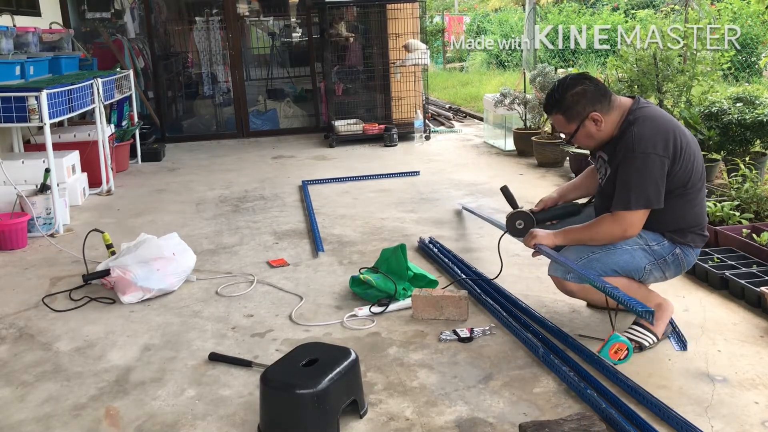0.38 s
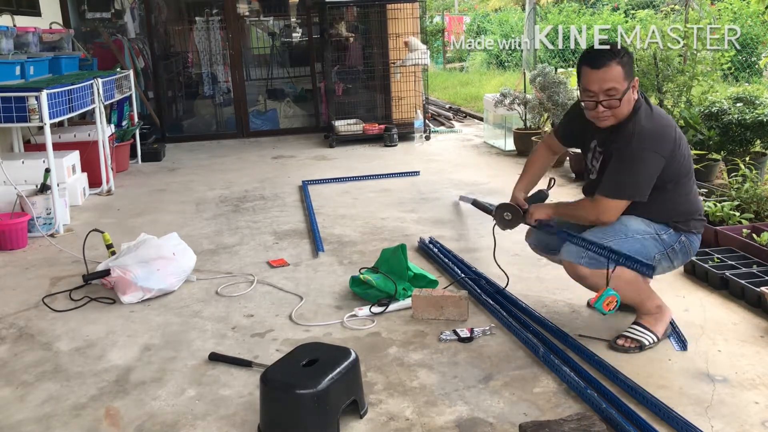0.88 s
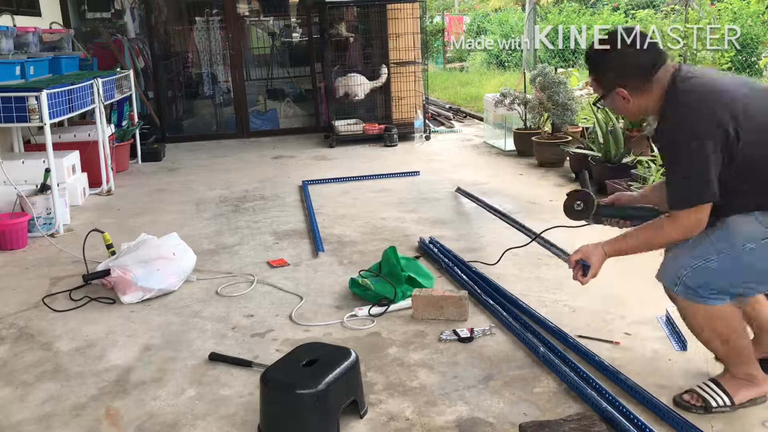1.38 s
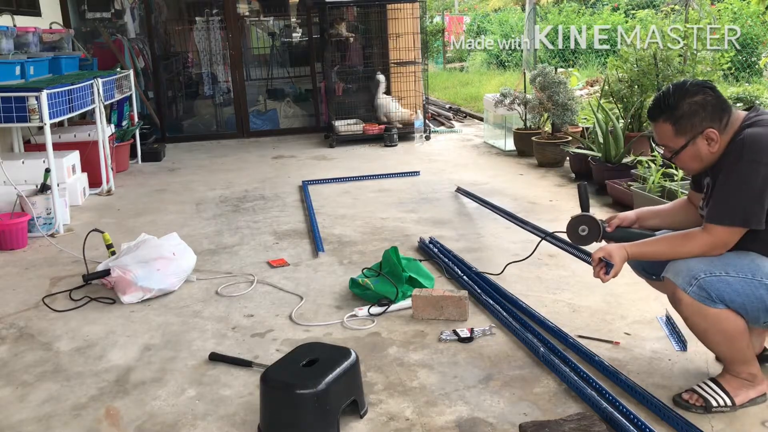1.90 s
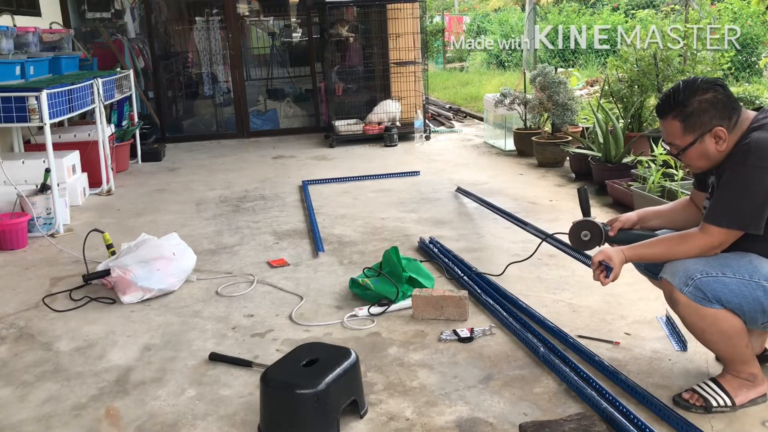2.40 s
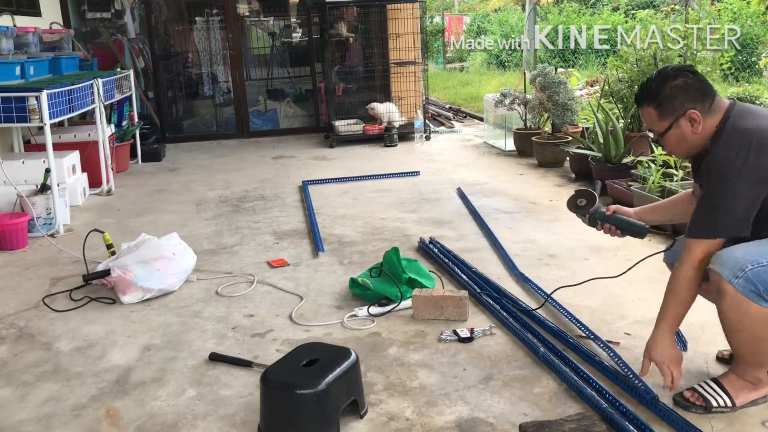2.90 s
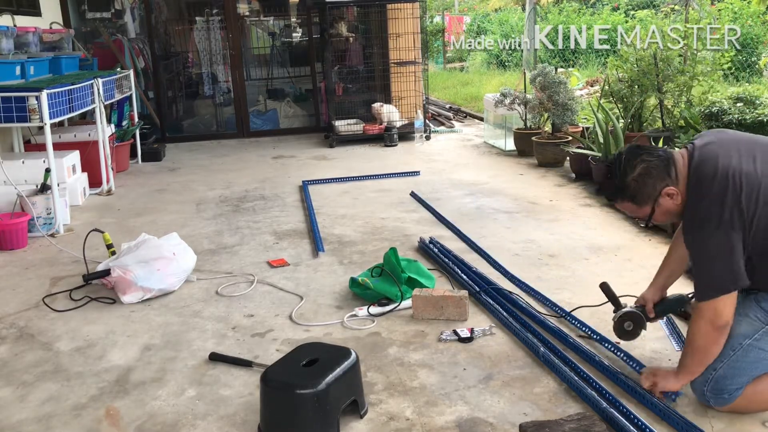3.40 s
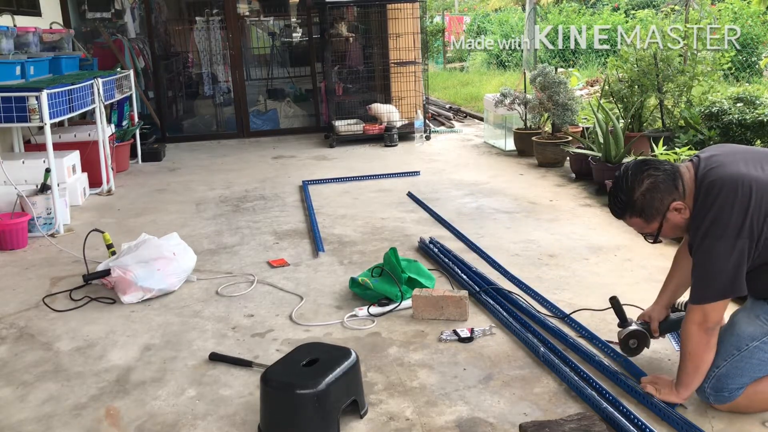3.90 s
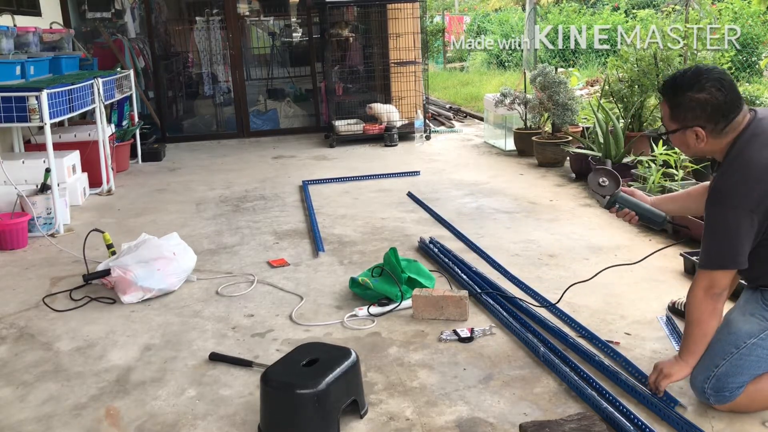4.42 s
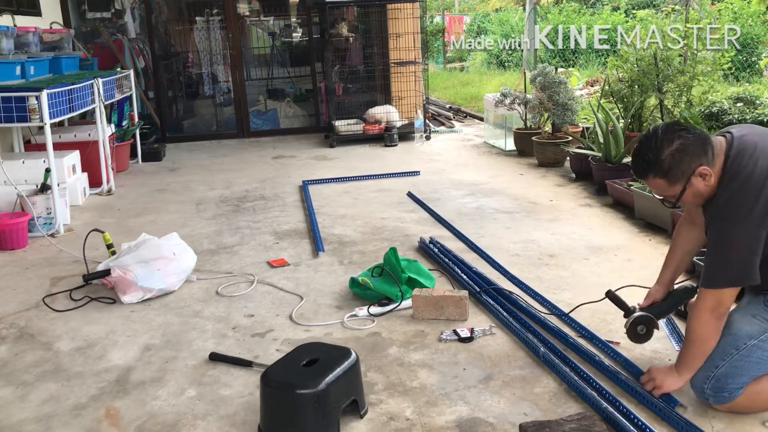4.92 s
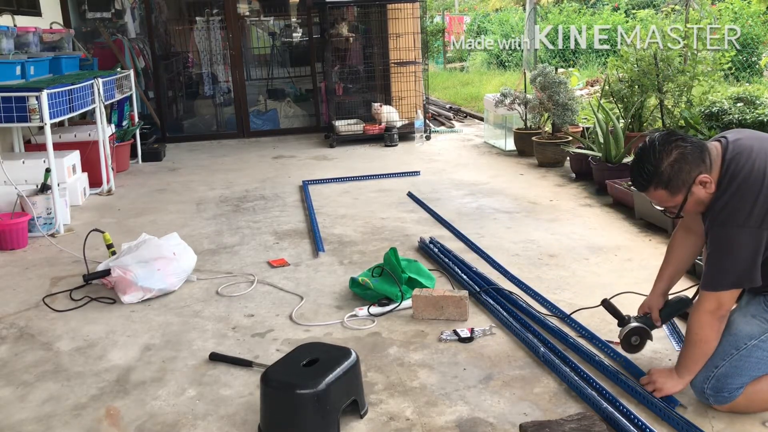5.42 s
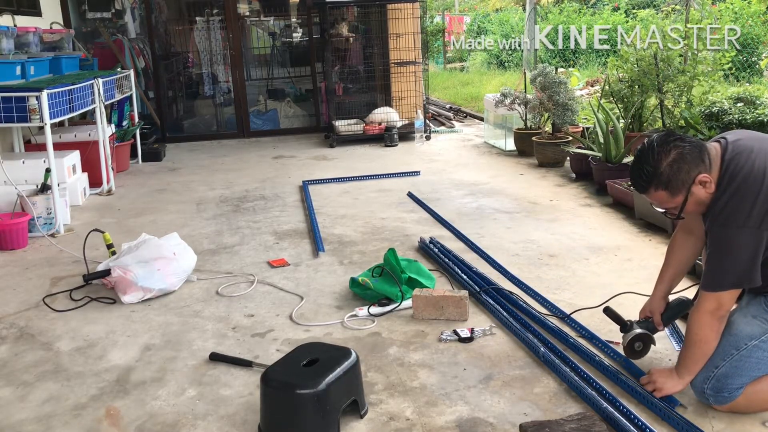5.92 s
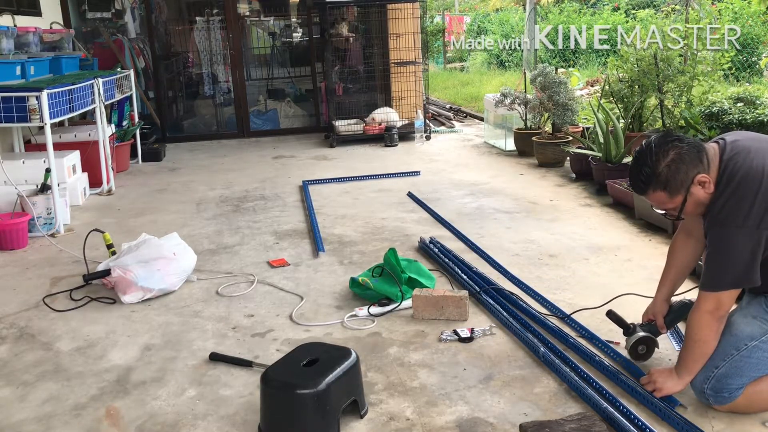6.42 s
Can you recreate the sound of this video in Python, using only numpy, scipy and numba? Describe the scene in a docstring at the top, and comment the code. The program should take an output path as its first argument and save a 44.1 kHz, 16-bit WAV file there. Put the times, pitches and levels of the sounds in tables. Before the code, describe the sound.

On a concrete porch, a hand-held grinder whirs thinly and bites steel briefly, then stops amid sharp clicks. It restarts into a longer, piercing, ringing screech that sags under load. Clacks and a squeak follow, then a duller cut, a quiet pause, and a restart with softer, interrupted cuts. Faint hum and outdoor wash lie beneath. One fairly distant microphone, almost no bass, everything unnaturally quick.

```python
"""On a concrete porch a hand-held angle grinder cuts thin steel angle, heard at several times its natural speed.
The motor fan is shaped noise with gear tones; load slows the wheel, whose strikes once a turn excite the
steel at multiples of the turn rate. Offcuts click as decaying noise bursts, short bursts rasp and small
things squeak as harmonic series, over mains hum, far traffic and an outdoor wash; one microphone, no bass."""
import sys
import numpy as np
from scipy import signal
from scipy.fft import rfft, irfft
from scipy.io import wavfile
from scipy.ndimage import uniform_filter1d
from numba import njit

SR = 44100
rng = np.random.default_rng(int(sys.argv[2]) if len(sys.argv) > 2 else 0)


def level_to_linear(level):
    """Convert decibel levels to linear amplitude factors, elementwise."""
    exponent = np.asarray(level, float) / 20
    return 10 ** exponent


def store_wav(level_fs):
    """Save 16-bit WAV to argv[1]."""
    pcm = np.round(np.clip(np.atleast_2d(level_fs), -1, 1) * 32767)
    wavfile.write(sys.argv[1], SR, pcm.T.astype(np.int16))


N = 288855
T = np.arange(N) / SR
TOP_HZ = 15700  # upper edge of the sound
RECOVERY_HZ, IDLE_HZ = 699.5, 686  # rate the recovery heads for; unloaded turn rate, at which it is capped


def level(x, db):
    """Normalization: scale a signal to an rms level in dB."""
    return x * level_to_linear(db) / np.sqrt(np.mean(x ** 2) + 1e-18)


def colour(x, gain):
    """Minimum-phase filtering: folding the cepstrum of gain(Hz) gives a causal impulse response."""
    cepstrum = irfft(np.log(gain(np.linspace(1, SR / 2, 2049)) + 1e-5))
    cepstrum[1:2048] *= 2
    cepstrum[2049:] = 0
    response = irfft(np.exp(rfft(cepstrum)))[:2048]
    return signal.fftconvolve(x, response)[:len(x)]


def shape(points):
    """Spectral envelope: gain interpolated in dB over log frequency from (f/Hz, level/dB) points."""
    hz, db = np.transpose(points)
    return lambda f: level_to_linear(np.interp(np.log(f), np.log(hz), db))


def hump(hz, octaves):
    """Broad resonance: Gaussian gain on a log-frequency axis, its standard deviation in octaves."""
    return lambda f: np.exp(-.5 * (np.log2(f / hz) / octaves) ** 2)


def split_at(x, hz, order):
    """Crossover: Butterworth low and high bands of a signal."""
    return [signal.sosfilt(signal.butter(order, hz, kind, fs=SR, output="sos"), x) for kind in ("low", "high")]


def walk(n, rate):
    """Slow random modulation: levels held 1 / rate s and slewed twice, spread near 1."""
    held = max(int(SR / rate), 1)
    steps = np.repeat(rng.standard_normal(n // held + 1), held)
    return 1.204 * uniform_filter1d(uniform_filter1d(steps, held), held)[:n]


def between(start, end):
    """Time sampling: the span of samples between two times in s."""
    return slice(int(start * SR), min(int(end * SR), N))


def play(rows):
    """Linear interpolation: the span of a table that begins with t/s, and its other columns by sample."""
    times, *columns = np.transpose(rows)
    span = between(times[0], times[-1])
    return span, [np.interp(T[span], times, column) for column in columns]


def fade(n, s):
    """Amplitude envelope: linear ramps of s seconds at both ends."""
    i = np.arange(n)
    return np.clip(np.minimum(i, n - i) / (s * SR), 0, 1)


@njit
def lag(x, rise, fall):
    """First-order relaxation: follow x at one rate per sample upward and another downward."""
    y, z = np.empty(len(x)), 0.
    for i in range(len(x)):
        z += (x[i] - z) * (rise if x[i] > z else fall)
        y[i] = z
    return y


def patchy(x, db, rate):
    """Band modulation: each of seven treble regions swells and thins on its own."""
    changes = 0
    for hz in np.geomspace(2700, 14000, num=7):
        changes = changes + colour(x, hump(hz, 0.12)) * (level_to_linear(db * walk(N, rate)) - 1)
    return x + changes


def chirps():
    """Gaussian tone bursts with a slight glide: faint thin chirps flicker in the treble."""
    count, low_hz, loudest_db, unit_s = 90, 3400, -59, .014
    out, t = np.zeros(N), T[:3000]
    for when, pitch, softness, length, glide in rng.random((count, 5)):
        hz = low_hz * 2 ** (2 * pitch) * (1 + (glide - .5) * t)
        envelope = np.exp(-((t / unit_s - 2) / (.5 + length)) ** 2)
        tone = np.sin(2 * np.pi * np.cumsum(hz) / SR + walk(len(t), 200))
        i = int(when * (N - len(t)))
        out[i:i + len(t)] += level_to_linear(loudest_db - 10 * softness) * envelope * tone
    return out


def mains_hum():
    """Harmonic radiation of a mains-driven machine nearby: multiples of one rate, each wavering slightly."""
    # hum lines: multiple of the base rate, rms level/dB
    lines = [(2, -68), (3, -80), (4, -68.5), (5, -77), (6, -69), (7, -73), (9, -74), (10, -72)]
    base_hz = 400.1
    out = np.zeros(N)
    for k, db in lines:
        tone = np.sin(2 * np.pi * k * base_hz * T + 0.21 * walk(N, 3.07))
        out += np.sqrt(2) * level_to_linear(db + 1.0 * walk(N, 6.2)) * tone
    return out


def far_engines():
    """Frequency glides: distant engine notes are unsteady sines moving from one pitch to another."""
    # far engine notes: start t/s, end t/s, first f/Hz, last f/Hz, peak level/dB
    drones = [(0, 0.805, 371.5, 387, -70), (0.793, 1.688, 390.5, 353.5, -69),
              (1.706, 1.804, 353, 250, -69.5), (2.586, 2.718, 237, 340, -72),
              (2.689, 4.767, 400.6, 386.8, -72.5), (4.755, 5.286, 380, 343.6, -65),
              (5.298, 6.516, 365, 417.5, -71.5), (0, 0.294, 730, 740, -62), (0.269, 0.952, 730, 788, -65.5),
              (3.334, 3.502, 395, 455, -69), (3.932, 4.396, 661, 740, -72),
              (4.41, 5.16, 251.7, 259.6, -73.5), (5.141, 5.34, 264.4, 224, -80),
              (5.807, 6.49, 256.8, 285.5, -79.5)]
    out = np.zeros(N)
    for start, end, first_hz, last_hz, db in drones:
        span, (hz,) = play([(start, first_hz), (end, last_hz)])
        n = len(hz)
        phase = 2 * np.pi * np.cumsum(hz + 1.8 * walk(n, 12)) / SR
        out[span] += level_to_linear(db + 1.9 * walk(n, 9.1)) * np.sin(phase) * fade(n, 0.027)
    return out


def yard():
    """Superposition of incoherent sources: a wash with patchy treble, chirps, hum and far engines."""
    # relative spectrum of the outdoor wash: f/Hz, level/dB per Hz
    spectrum = [(150, -26), (250, -20), (361, -8), (520, -10), (700, -14), (1500, -15), (2800, -14),
                (4700, -18.5), (6000, -18.5), (10000, -13), (16000, -19.5)]
    wash = level(colour(rng.standard_normal(N), shape(spectrum)), -59)
    wash = wash * level_to_linear(.9 * walk(N, 2.8))
    return patchy(wash, 3.5, 14) + chirps() + mains_hum() + far_engines()


def hits():
    """Impact excitation: a sharp tick and exponentially dying noise ring in one broad region."""
    # things striking concrete, and the switch click at 1.581 s: t/s, peak level/dB, centre f/Hz, width/octaves,
    # decay time by 60 dB/s
    strikes = [(1.164, -14.5, 8040, 1.23, 0.048), (1.19, -31.5, 10000, 1.3, 0.092),
               (1.222, -38, 7000, 0.83, 0.025), (1.358, -24, 7000, 1.9, 0.028),
               (1.581, -28.5, 9100, 1.43, 0.047), (2.659, -23.5, 11000, 0.47, 0.086),
               (2.66, -33.5, 1150, 1.17, 0.02), (2.679, -8.5, 2780, 1.7, 0.0037),
               (2.687, -12.5, 4500, 3.8, 0.0029), (2.83, -29, 7600, 0.38, 0.04),
               (2.948, -27.5, 1560, 0.79, 0.021), (2.956, -28, 1820, 0.39, 0.034),
               (2.956, -24.5, 6240, 0.46, 0.058), (4.43, -42, 6000, 0.77, 0.17),
               (5.151, -26.5, 11000, 1.8, 0.024)]
    out, t = np.zeros(N), T[:6000]
    for s, db, hz, octaves, t60 in strikes:
        push = .5 * rng.standard_normal(len(t)) * level_to_linear(-60 * t / max(t60, .001))
        push[0] = 2.95  # the tick
        sound = colour(push, hump(hz, octaves))
        i = int(s * SR)
        out[i:i + len(t)] += level_to_linear(db) * sound / np.max(np.abs(sound))
    return out


def rasps():
    """Band-limited noise: short rough bursts, from dragged steel or from the motor starting."""
    # rasping bursts: t/s, length/s, rms level before the envelope/dB, centre f/Hz, width/octaves
    bursts = [(4.895, 0.053, -58, 2830, 0.22), (0.916, 0.055, -56, 10500, 0.17),
              (.972, 0.072, -54, 10900, 0.79), (.768, .04, -59, 13200, .08),
              (1.364, 0.041, -47.5, 7000, 3.2), (1.612, 0.036, -39.5, 14500, 0.27),
              (4.262, 0.034, -54, 6000, 2.6), (4.905, 0.055, -42, 14500, 0.26),
              (5.161, 0.013, -42, 12000, 0.69), (5.175, 0.023, -45.5, 10300, 1.4),
              (5.343, .045, -44, 14100, 0.14)]
    out = np.zeros(N)
    for s, length, db, hz, octaves in bursts:
        n, i = int(length * SR), int(s * SR)
        rough = rng.standard_normal(n) * level_to_linear(3 * walk(n, 400))
        envelope = fade(n, 0.0029) * np.linspace(1.5, .4, n)
        out[i:i + n] += level(colour(rough, hump(hz, octaves)), db) * envelope
    return out


def squeaks():
    """Stick-slip oscillation: a harmonic series sounds where the rubbed thing resonates."""
    # steady squeaks: start t/s, length/s, pitch f/Hz, highest level/dB, strongest region f/Hz
    steady = [(0.63, 0.065, 1990, -61, 2010), (0.732, 0.031, 2660, -48.5, 6430),
              (3.311, 0.019, 1740, -30, 14300), (4.14, 0.061, 3830, -58.5, 3700),
              (4.656, 0.018, 2776, -43, 8250), (4.9, 0.036, 8140, -43.5, 8000)]
    # swooping squeaks: strongest region f/Hz, width/octaves, then rows of t/s, pitch f/Hz, level/dB
    swoops = [(2900, .4, [(.09, 2540, -82), (.13, 2900, -61), (.175, 3250, -68)]),
              (3300, .46, [(2.75, 1500, -45), (2.76, 2650, -38), (2.77, 3000, -37), (2.785, 2650, -37),
              (2.801, 1750, -46)]), (895, 0.56, [(4.422, 1140, -79), (4.432, 1016, -49.5), (4.46, 794, -56),
              (4.503, 690, -82)])]
    rise, edge_db, steady_octaves = 0.37, -10, 0.35  # share of the length; level at both ends; region width
    notes = []
    for s, length, hz, db, peak_hz in steady:
        rows = [(s, hz, db + edge_db), (s + rise * length, hz, db), (s + length, hz, db + edge_db)]
        notes.append((peak_hz, steady_octaves, rows))
    out = np.zeros(N)
    for peak_hz, octaves, rows in notes + swoops:
        span, (hz, db) = play(rows)
        n = len(hz)
        phase = 2 * np.pi * np.cumsum(hz * (1 + 0.022 * walk(n, 350))) / SR
        resonance = hump(peak_hz, octaves)
        note = np.zeros(n)
        for k in range(1, 11):
            partial = np.sin(k * phase + .45 * walk(n, 700))
            note += resonance(k * hz) * partial * (k * hz < TOP_HZ)
        out[span] += level(note, 0) * level_to_linear(db + 1.0 * walk(n, 143))
    return out


def wheel_phase():
    """Rotational dynamics under load: turn rate in Hz and angle; it sags in each press and recovers after."""
    # the hand leans on the tool: start t/s, end t/s, then the slowing below the recovery rate
    # at which it would settle, first f/Hz and last f/Hz
    presses = [(.24, .428, 27, 53), (1.815, 2.075, 46, 99), (2.075, 2.14, 89, 89), (2.253, 2.665, 74, 139),
               (3.61, 3.775, 49, 94), (3.801, 3.907, 49, 95), (5.518, 5.703, 22, 42), (5.76, 5.8, 40, 77),
               (5.85, 5.88, 31, 60), (5.963, 6.083, 35, 68), (6.121, 6.245, 40, 76), (6.413, 6.55, 38, 70)]
    sag_s, recover_s = .038, .13  # time constants
    judder = .03  # share of the slowing that wavers
    load = sum(np.interp(T, [start, end], [first, last], 0, 0) for start, end, first, last in presses)
    slowing = lag(load, 1 / (sag_s * SR), 1 / (recover_s * SR))
    hz = np.minimum(RECOVERY_HZ - slowing, IDLE_HZ)
    hz += judder * (IDLE_HZ - hz) * walk(N, 30)  # the hand trembles
    return hz, 2 * np.pi * np.cumsum(hz) / SR


def motor(turns, phase):
    """Turbulent fan noise and gear-mesh tones: both weaken as the wheel slows, and die away in coasting."""
    # motor runs: switch-on t/s, switch-off t/s, whir level below 10 kHz/dB, boost above 10 kHz/dB,
    # coasting loss/(dB/s)
    runs = [(-.1, 0.52, -50.5, 5, 49.5), (1.596, 2.673, -51, 6.5, 69), (2.716, 3.928, -50.5, 3, 132),
            (3.946, 4.078, -53.5, 8, 66), (4.877, 4.953, -52, 4.5, 64), (5.316, 6.55, -49.5, 1, 50)]
    # relative spectrum of the fan: f/Hz, level/dB per Hz
    whir = [(590, -49.5), (1000, -42.5), (1610, -16.5), (2150, -16), (2360, -8.5), (2560, -11.5),
            (4480, -13), (4800, -7.5), (5700, -5.5), (10200, -7.5), (12700, -1.5), (16000, -2)]
    # gearbox notes: multiple of the wheel turn rate (armature 3.55), peak level re whir below 10 kHz/dB
    gear_notes = [(1, -23), (2, -27), (3, -25), (3.55, -12.5), (4.55, -25)]
    dulled, top_dulled = 0.045, 0.035  # dB lost per Hz of slowing, below and above 10 kHz
    spin_up_s = 0.0057
    coast_dulling = 0.26  # the band above 10 kHz dies this share faster
    slowing = IDLE_HZ - turns
    rush = patchy(colour(rng.standard_normal(N), shape(whir)), 2.5, 22)
    low, top = split_at(rush, 10000, 4)
    scale = np.std(low)
    notes = np.zeros(N)
    for k, db in gear_notes:
        notes += level_to_linear(db + 2.2 * walk(N, 14)) * np.sin(k * phase + 0.26 * walk(N, 12))
    notes *= level_to_linear(-2 * dulled * slowing)  # the notes fade twice as fast in dB
    low *= level_to_linear(.8 * walk(N, 24) - dulled * slowing) / scale
    top *= level_to_linear(1.0 * walk(N, 25) - top_dulled * slowing) / scale
    out = np.zeros(N)
    for on, off, db, top_db, coast_db in runs:
        lost = coast_db * np.maximum(T - off, 0)
        spin_up = np.clip((T - on) / spin_up_s, 0, 1)
        out += (low + notes + top * level_to_linear(top_db - coast_dulling * lost)) * level_to_linear(db - lost) * spin_up
    return out


def whistles(angle):
    """Mode locking: one multiple of the turn rate locks on to the bar and stands out, wavering."""
    # whistling multiples: start t/s, end t/s, multiple of the turn rate, rms level before wavering/dB
    locked = [(0.324, 0.425, 6, -57.5), (.33, .43, 12, -58), (1.883, 1.956, 9, -51.5),
              (1.877, 1.95, 15, -49.5), (1.925, 2.004, 10, -47), (1.978, 2.14, 11, -48.5),
              (1.979, 2.1, 17, -46.5), (1.98, 2.14, 6, -61.5), (2.287, 2.395, 11, -49.5),
              (2.36, 2.467, 18, -35.5), (2.495, 2.63, 13, -42.5), (2.506, 2.593, 21, -31.5),
              (2.597, 2.663, 22, -30), (3.657, 3.724, 5, -50), (5.66, 5.71, 10, -55),
              (5.983, 6.2, 5, -63.5), (6.0, 6.216, 11, -61), (6.467, 6.554, 4, -60),
              (6.442, 6.553, 10, -58)]
    out = np.zeros(N)
    for start, end, multiple, db in locked:
        span = between(start, end)
        n = span.stop - span.start
        tone = np.sqrt(2) * np.sin(round(multiple) * angle[span] + 0.6 * walk(n, 90))
        out[span] += level_to_linear(db + 5.5 * walk(n, 32)) * tone * fade(n, 0.025)
    return out


def steel(f):
    """Modal resonance: bar and wheel modes over a rising skirt; the thin bar radiates little below its knee."""
    # narrow and broad resonances of bar and wheel: f/Hz, half-power width/Hz, level/dB
    modes = [(3700, 120, -16), (6300, 70, -19), (6800, 110, -11), (7600, 110, -10), (9000, 2000, -17),
             (11700, 2600, -11), (10900, 100, -8), (12300, 110, -6), (12600, 80, -10), (14800, 200, -3),
             (15300, 150, 0), (15600, 150, -3)]
    knee_hz = 6000
    skirt = level_to_linear(-18) * (f / 15000) ** 1.8
    power = sum(level_to_linear(db) ** 2 / (1 + (2 * (f - hz) / width) ** 2) for hz, width, db in modes)
    return np.sqrt(power + skirt ** 2) / np.sqrt(1 + (knee_hz / f) ** 8)


def flares():
    """Exponential growth and decay: the screech flares when the wheel catches; powers add."""
    # catches of the wheel: t/s, level/dB, held time/s
    catches = [(.262, -21, .005), (.378, -27, .01), (1.86, -27, 0.067), (2.01, -25.5, 0.0074),
               (2.085, -21, 0.018), (2.15, -23, 0.0054), (2.26, -22.5, 0.044), (2.475, -21.5, 0.0061),
               (2.58, -22, .03), (2.654, -22, .004), (5.6, -43.5, 0.0046), (5.68, -38, 0.0038),
               (5.789, -38.5, 0.0031), (5.88, -41.5, 0.0045), (6.14, -42.5, 0.087), (6.49, -39, 0.06)]
    rise, fall = 414, 255  # dB/s
    power = np.zeros(N)
    for s, db, held in catches:
        lost = rise * np.maximum(s - T, 0) + fall * np.maximum(T - s - held, 0)
        power += level_to_linear(db - lost) ** 2
    return power


def cutting(turns, angle):
    """Periodic forcing: the wheel's high spots strike the steel once a turn; grit rasps along with them."""
    # cuts in which the bar's narrow resonances sound, and cuts in which they are damped:
    # contact t/s, lift t/s, screech level above 14 kHz/dB,
    # bar below 14 kHz re screech, before a common -8.5 dB/dB, singing re grit before the resonances/dB
    ringing_cuts = [(0.257, 0.426, -37, 5, -3), (1.802, 2.143, -32.5, -4, 11), (2.141, 2.23, -27, -7, -10),
                    (2.227, 2.444, -25.5, -7, 2), (2.434, 2.666, -27, -7, 10)]
    damped_cuts = [(3.627, 3.92, -34, 0.5, -6.5), (5.555, 5.93, -57, 5, -1), (5.934, 6.26, -41, 3, 1),
                   (6.436, 6.547, -36.5, 0.5, 13)]
    # damped response of bar and wheel: f/Hz, level/dB
    damped = [(710, -77), (1300, -24.5), (2900, -10), (3300, -11.5), (3700, -18.5), (9000, -6.5),
              (10500, -2.5), (15900, -10.5)]
    bite_db, bite_s = -4.5, 0.03  # a cut starts this much lower and closes the gap with this time constant
    wear_db, wear_rate, wobble_rad = 3.8, 26, .5  # wear rate in steps per s
    flare = flares()
    out = np.zeros(N)
    for ringing, cuts in ((True, ringing_cuts), (False, damped_cuts)):
        for start, end, db, bar_db, sing_db in cuts:
            span = between(start, end)
            hz, phase = turns[span], angle[span]
            n = len(hz)
            steady = level_to_linear(db + bite_db * np.exp(-T[:n] / bite_s))
            loud = np.sqrt(steady ** 2 + flare[span])
            # the pattern of high spots wears and shifts, so every multiple swells and wobbles alone
            sing = np.zeros(n)
            for k in range(2, 29):
                swell = level_to_linear(wear_db * walk(n, wear_rate))
                wobble = wobble_rad * walk(n, 41.7) + 2 * np.pi * rng.random()
                sing += swell * np.sin(k * phase + wobble) * (k * hz < TOP_HZ + 300)
            grit = rng.standard_normal(n) * (1 + 0.74 * np.sin(phase)) * level_to_linear(1.2 * walk(n, 57))
            ring = colour(level(sing, sing_db) + level(grit, 0), steel if ringing else shape(damped))
            bar, top = split_at(ring, 14000, 8)
            # the screech keeps its overall loudness while single multiples come and go
            top = top / np.sqrt(uniform_filter1d(top ** 2, size=1300) + 0.041 * np.mean(top ** 2))
            # a ringing bar holds steady while the screech flares; in a damped cut both flare
            bar = (steady if ringing else loud) * level_to_linear(bar_db) * level(bar, -8.5)
            out[span] += (loud * top + bar) * fade(n, 0.0024)
    return out


def porch(x):
    """Reverberation: many short, exponentially decaying echoes from floor, roof and wall ripple the sound."""
    t60_s, echo_db = .09, -13  # echo level relative to the direct sound
    t = T[:4000]
    sparse = rng.standard_normal(len(t)) * (rng.random(len(t)) < .15)
    echoes = sparse * level_to_linear(-60 * t / t60_s) * (t > .002)
    echoes *= level_to_linear(echo_db) / np.sqrt(np.sum(echoes ** 2))
    return (x + signal.fftconvolve(x, echoes)[:N]) / np.sqrt(1 + level_to_linear(echo_db) ** 2)


def scene():
    """Linear superposition at one microphone: both channels alike."""
    turns, angle = wheel_phase()
    echoing = porch(motor(turns, angle) + cutting(turns, angle) + whistles(angle) + squeaks())
    mono = echoing + hits() + rasps() + yard()
    return np.array([mono, mono])


def top_cut(x):
    """Nothing passes above the cut-off."""
    return signal.sosfilt(signal.butter(12, 17100, fs=SR, output="sos"), x)


def record(dry):
    """Band limitation: a high-pass removes the bass and an elliptic low-pass gives a steep top edge."""
    x = signal.sosfilt(signal.butter(6, 200, "high", fs=SR, output="sos"), dry)
    x = signal.sosfilt(signal.ellip(10, .3, 70, TOP_HZ, fs=SR, output="sos"), x)
    return top_cut(x)


dry = scene()
out = record(dry)
store_wav(out)
```